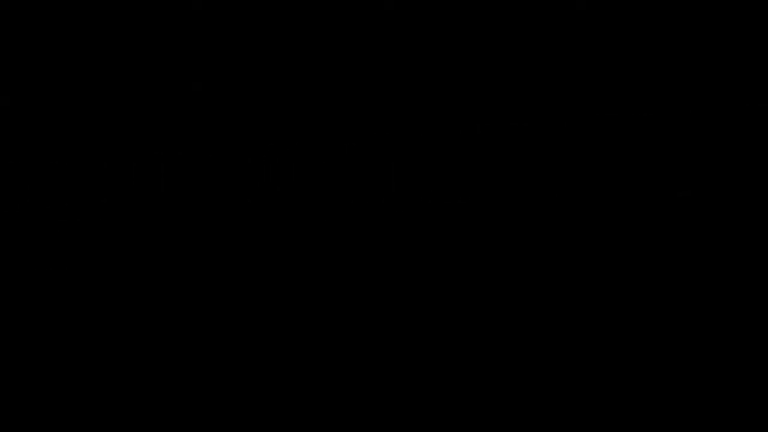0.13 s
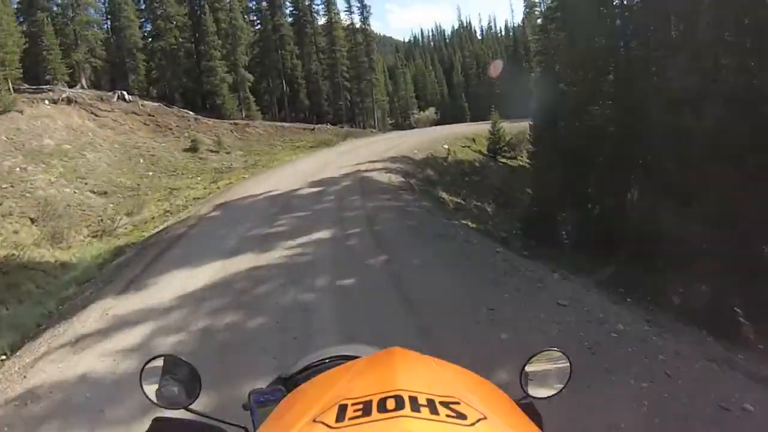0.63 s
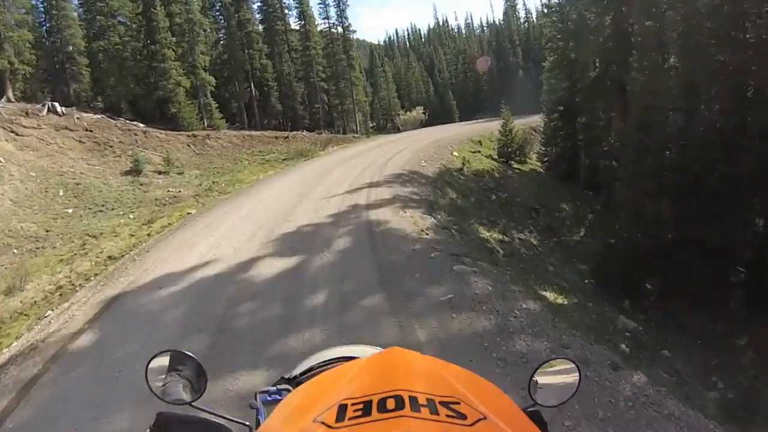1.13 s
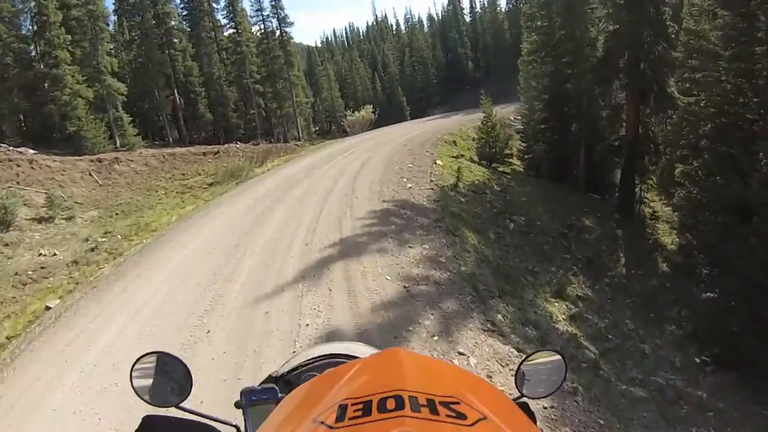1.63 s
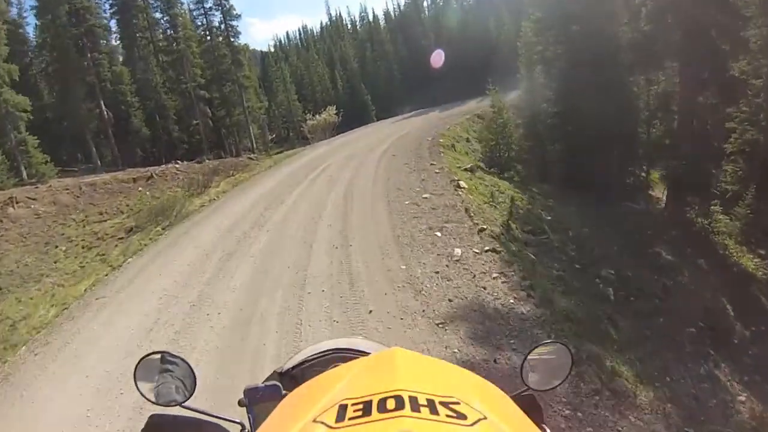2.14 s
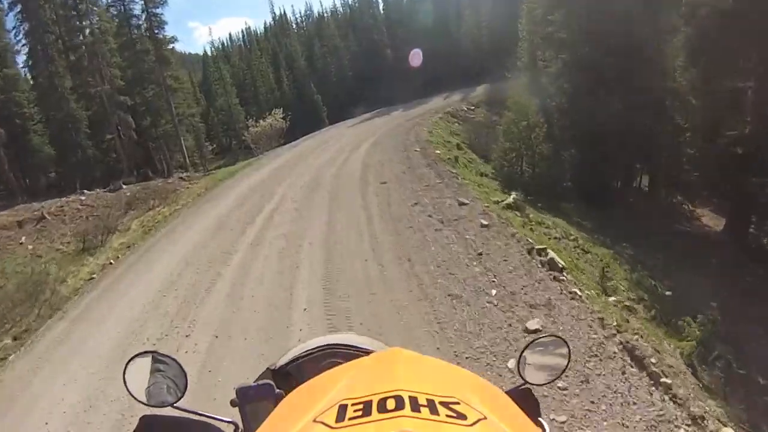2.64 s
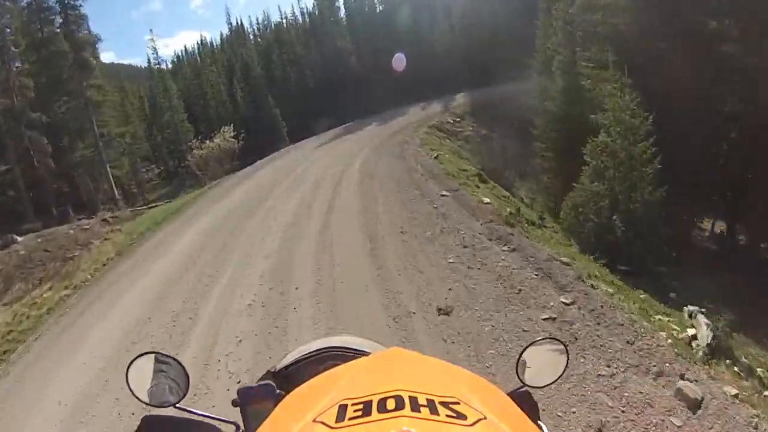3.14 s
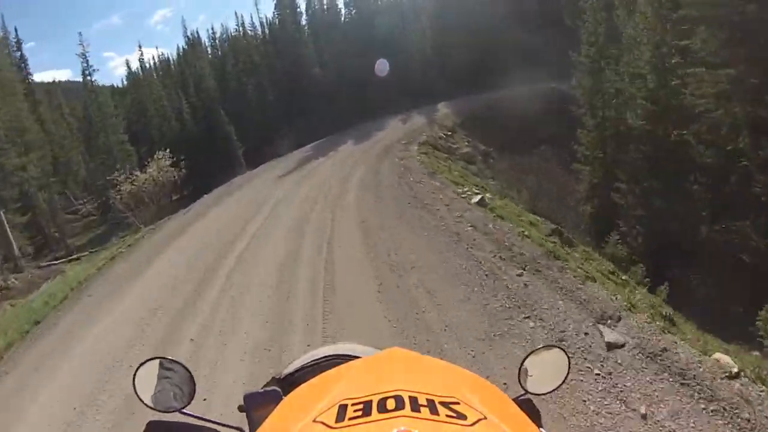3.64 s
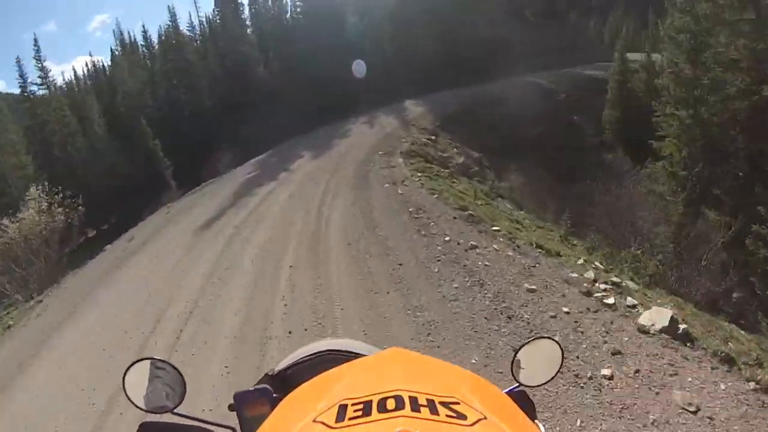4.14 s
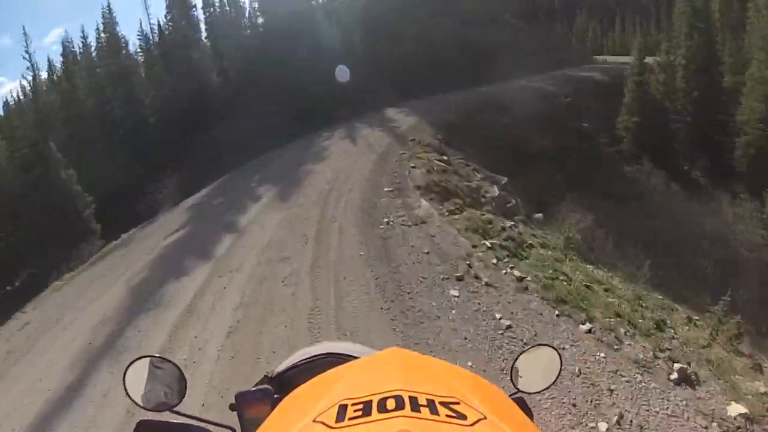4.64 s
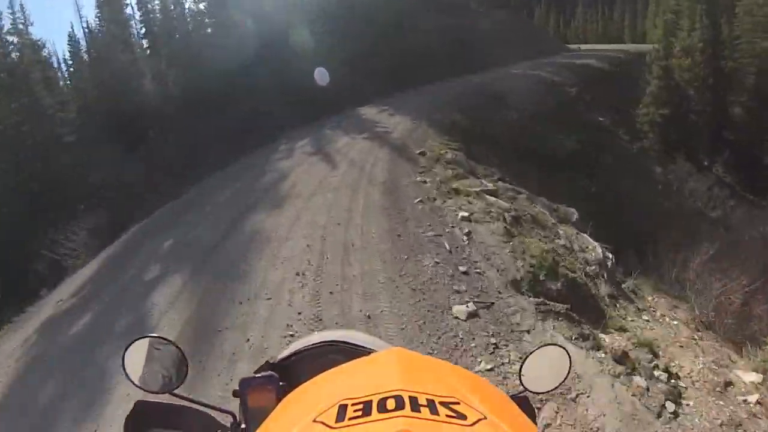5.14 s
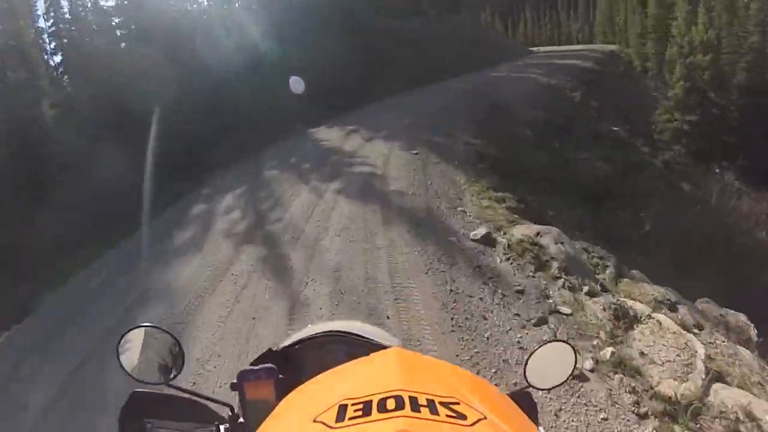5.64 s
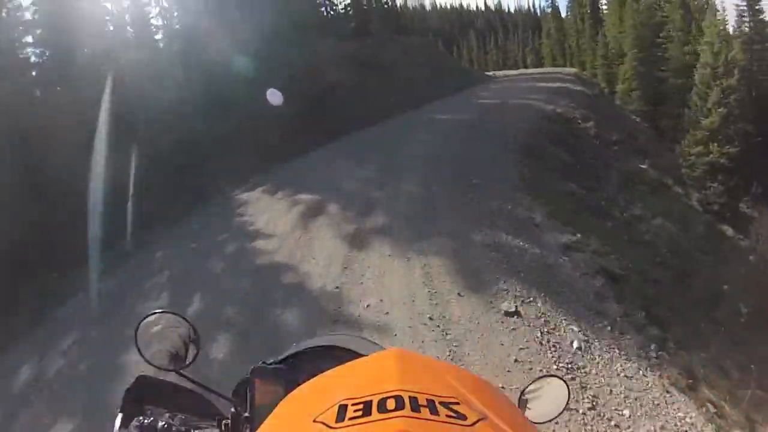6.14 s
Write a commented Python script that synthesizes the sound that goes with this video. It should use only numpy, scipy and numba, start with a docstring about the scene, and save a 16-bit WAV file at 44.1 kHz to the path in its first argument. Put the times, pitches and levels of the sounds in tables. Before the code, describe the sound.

A helmet-mounted, enclosed microphone hears a motorcycle's low, uneven chugging, with faint mechanical ticking and a hollow housing buzz that grows as the throttle opens. Airy wind and road hiss throb along with each firing, while short gusts thud. A barely audible high whistle vanishes early. After five seconds, thrown stones clack and rattle against the bike on the open forest road, and wind rises to an abrupt end.

```python
"""A climbing gravel road, heard at a boxed camera on the helmet of a single-cylinder motorcycle's rider.
Each firing is an impulse that excites decaying exhaust modes, a burst of noise and the camera housing.
Filtered noise gives wind, rustle and hiss, all stirred by the exhaust beat; smooth pulses are hard gusts.
Stones are short noise bursts, and a faint whistle, a narrow resonance driven by noise, dies early.
The sum is dulled, softly limited, ducked in small steps at its peaks and faded in."""
import sys
import numpy as np
from scipy import signal
from scipy.fft import rfft, irfft, next_fast_len
from scipy.io import wavfile
from scipy.ndimage import uniform_filter1d
from numba import njit

SR = 44100
rng = np.random.default_rng(int(sys.argv[2]) if len(sys.argv) > 2 else 0)


def volts_from_db(level):
    """Convert decibel levels to linear amplitude ratios."""
    exponent = np.asarray(level, float) / 20
    return 10 ** exponent


def to_wav(s):
    """Save 16-bit WAV."""
    ch = np.atleast_2d(s).T  # columns
    pcm = np.round(np.clip(ch, -1, 1) * 32767)  # PCM
    wavfile.write(sys.argv[1], SR, pcm.astype(np.int16))


N = 276631
TIME_S = np.arange(N) / SR

# crankshaft speed, one firing every second turn: [t/s, speed/rpm]
CRANK_SPEED = [(0.25, 2307.1), (0.5, 2133.8), (0.85, 2109.5), (1.4, 2071.9), (1.63, 2160.2), (1.86, 2079.5),
               (2.4, 2071.2), (3.1, 2111.5), (4.2, 2237.1), (5.1, 2353.8), (5.76, 2409.1), (6.3, 2347.8)]
# engine load as the throttle opens on the climb: [t/s, load/1]
ENGINE_LOAD = [(0.5, 0.24), (1.5, 0.06), (2.3, 0.49), (3, 0.44), (3.4, 0.5), (3.7, 0.64), (4.3, 0.71),
               (4.8, 0.86), (5.3, 0.89), (5.8, 0.89), (6.3, 0.65)]
# exhaust modes: [f/Hz, signed relative strength/1, swell time/ms, time advance/ms, gain at full load/dB]
EXHAUST_MODES = [(95.8, -0.95, 5.73, 7.3, 3.5), (125.6, -0.074, 8, 5, 11.5), (262.8, 0.41, 8.2, 6.9, 6.5),
                 (39.33, 0.28, 25, 12.0, 4.5)]
# camera housing modes: [f/Hz, relative level/dB, t60/s]
HOUSING_MODES = [(688.6, 8.5, 0.098), (884, -3.5, 0.14)]
# how hard the engine's shake reaches the helmet: [t/s, relative level/dB]
HELMET_SHAKE = [(0.4, -45), (0.6, -41.5), (0.95, -38.5), (1.3, -42.5), (2.0, -41.5), (2.7, -46.5),
                (3.15, -40.5), (3.35, -44), (3.65, -37), (4.1, -38), (4.4, -34), (4.8, -39), (5.0, -35),
                (5.55, -33.5), (5.7, -37), (6.27, -32.5)]
# strength of the air stream past the helmet: [t/s, relative level/dB]
AIR_STREAM = [(0.4, 0), (.6, 2), (.7, 2), (.9, 3.5), (1.3, -2), (1.9, 0), (2.5, 0.5), (2.8, -3), (3.1, 5.5),
              (3.35, -1), (3.7, 1), (4.1, -1.5), (4.4, 2), (4.7, 1.5), (5.1, 5), (5.4, 2), (5.52, 6.5),
              (5.75, 2.5), (5.97, 7.5), (6.04, -2), (6.075, 7), (6.11, 5.5), (6.18, 7.5), (6.21, 8),
              (6.24, 9), (6.27, 9.5)]
# spectral densities of the three noises: [f/Hz, relative level/dB]
RUMBLE_SPECTRUM = [(12, -9.5), (25, -2.5), (50, -2), (75, -5), (100, -6.5), (130, -10.5), (180, -14.5),
                   (300, -22), (420, -31)]
RUSTLE_SPECTRUM = [(150, -15), (260, 5), (340, -2), (430, -2), (540, 0), (690, -6), (800, -6), (950, -7.5),
                   (1250, -18.5), (1700, -22), (2300, -37)]
HISS_SPECTRUM = [(590, -22), (1000, -0.5), (1080, -5), (1490, -13), (2040, -11.5), (2420, -17.5),
                 (3080, -14), (3740, -24), (5160, -21), (5990, -28), (6950, -28), (8850, -34.5),
                 (11400, -35.5), (14200, -45), (15500, -45)]
# hard gusts on the microphone port: [t/s, signed pressure/1, width/ms]
GUSTS = [(0.608, -1.21, 3.9), (1.004, 0.58, 2.3), (1.180, -0.31, 1.8), (1.418, 0.31, 12), (1.689, 0.3, 8.2),
         (1.843, -0.85, 5.2), (1.961, 0.72, 5.1), (2.151, 0.49, 5.8), (2.324, 0.45, 4), (2.611, 0.64, 3.5),
         (2.951, -0.42, 12), (3.02, -0.4, 1.6), (3.313, -0.78, 7.5), (3.799, -0.15, 1.6),
         (3.963, 0.69, 3.8), (4.232, -0.31, 3.9), (4.576, -0.84, 6), (4.658, 0.48, 8.7), (4.81, 0.51, 6.2),
         (5.033, -0.54, 4.6), (5.329, 0.24, 6.8), (5.823, 0.3, 5.8)]
# stones thrown against the frame: [t/s, level before the envelope/dB, centre f/Hz, decay time/ms]
STONE_HITS = [(0.609, -41, 4500, 7), (0.800, -44.5, 7500, 12), (1.336, -41, 950, 6.5),
              (1.851, -34.5, 5000, 17), (1.957, -40, 3800, 6.3), (2.084, -27.5, 950, 16),
              (5.487, -23, 920, 10), (5.507, -21, 950, 6.6), (5.574, -15, 1500, 6.4),
              (5.579, -25.5, 3600, 8.4), (5.618, -33, 2300, 13), (5.686, -29, 3600, 16),
              (5.842, -22, 1090, 11), (5.950, -22, 950, 23), (5.960, -40, 4700, 40), (6.062, -22, 890, 13),
              (6.115, -28, 885, 10), (6.144, -20, 990, 17), (6.174, -22, 990, 3.4), (6.183, -23, 940, 10)]

FIRST_FIRING_S = 0.1746   # at full load
ADVANCE_MS = 1.8          # firings come this much earlier at zero load
THUMP_DB, FIRING_JITTER_MS = -13, 0.1   # gain at no load; spread of the timing
UNEVEN_DB, UNEVEN_LOAD_DB = 1, -0.8     # firings vary most at light load
PIPE_ECHO_MS, ECHO_SHARE, ECHO_RISE = 9.24, 0.27, 0.36   # the share rises with load
# gas bursting past the exhaust valve
RASP_DB, RASP_LOAD_DB, RASP_MS, RASP_LOW_HZ, RASP_HIGH_HZ = -49.5, 4.5, 3, 824, 2980
RING_DB, ROAD_SHAKE = 4, 0.008   # gain on HELMET_SHAKE; road noise against unit shake impulses
# the valve gear is loudest near one speed
KNOCK_DB, KNOCK_RISE_DB, KNOCK_RPM, KNOCK_SPAN_RPM, KNOCK_OFF_DB = -38.5, 1, 2254, 90, -13
TAP_HZ = 790
CLACK_DB, CLACK_HZ, CLACK_T60_S = -42, 474, 0.014   # the t60 is that of each of two resonators
THROB_LOAD_DB = 0.5   # change of the beat's depth at full load
RUMBLE_DB, RUMBLE_FOLLOWS, RUMBLE_LOAD_DB = -15, -0.034, -4   # the rumble eases with load
RUSTLE_DB = -30.5
# further dependence of the rustle on the air level, above and below two pitches
BRIGHT_HZ, BRIGHT_FOLLOWS = 860, 0.62
BOOM_HZ, BOOM_FOLLOWS, BOOM_LOAD_DB = 382, 1.24, -6   # the low rustle thins under load
# shares of the air's and the gusts' dB swing heard in the hiss
HISS_DB, HISS_FOLLOWS, HISS_GUSTS, HISS_LOAD_DB = -41, 0.34, 0.66, 4.5
GUST_BUILD_S, GUST_SURGE_DB, GUST_DUCK_S, GUST_DUCK_DB = 0.022, 5, 0.14, -4.5   # dB for unit pressure
STONE_ATTACK_MS = 1.6
# the t60 is that of each of two resonators
WHISTLE_HZ, WHISTLE_T60_S, WHISTLE_DB, WHISTLE_ENDS_S = 11100, 0.012, -71, 1.44
TOP_HZ, OVERLOAD = 12600, 2.1   # low-pass corner; soft limit of the amplitude
CEILING, DUCK_DB, RECOVER_DB_PER_S = 0.51, 0.33, 27.5   # the ceiling precedes fade and output gain
FADE_START_S, FADE_LENGTH_S, FADE_POWER, OUTPUT_DB = 0.27, 0.32, 0.72, -1.5


def exhaust():
    """Modal superposition: each firing swells in the pipe modes and returns once from the pipe's end."""
    load = in_time(ENGINE_LOAD)
    clicks = firings(uneven_db=UNEVEN_DB + UNEVEN_LOAD_DB * load, jitter_ms=FIRING_JITTER_MS)
    t = np.arange(SR // 8) / SR
    thump = np.zeros(N)
    for hz, strength, swell_ms, advance_ms, load_db in EXHAUST_MODES:
        u = t * 1000 / swell_ms
        swell = u * np.exp(1 - u)   # the pipe fills, then empties
        wave = signal.fftconvolve(clicks, strength * swell * np.sin(2 * np.pi * hz * t))
        advanced = wave[int(advance_ms * SR / 1000):][:N]
        thump += volts_from_db(load_db * load) * advanced
    echo = (ECHO_SHARE + ECHO_RISE * load) * pipe_delay(thump)
    return volts_from_db(THUMP_DB) * (thump + echo)


def rasp():
    """Jet noise: each firing spits a soft-edged burst past the exhaust valve; the pipe echo repeats it weaker."""
    fade = np.exp(-1000 / (RASP_MS * SR))
    clicks = firings(uneven_db=3.5, jitter_ms=1.24, turn=-0.077)
    burst = signal.lfilter([1], [1, -2 * fade, fade ** 2], clicks)
    burst = burst + 0.69 * pipe_delay(burst)
    hiss = coloured(HISS_SPECTRUM, lumpy_db=1.7, rate=37)
    noise = filtered(hiss, 2, [RASP_LOW_HZ, RASP_HIGH_HZ], "band")
    return volts_from_db(RASP_DB + RASP_LOAD_DB * in_time(ENGINE_LOAD)) * rms_one(burst * noise)


def engine():
    """Forced resonance: the crank's mechanical excitation reaches the helmet as ring, knock and clack."""
    return housing_ring() + valve_knock() + valve_clack()


def housing_ring():
    """Alternating forcing: two opposed shakes a cycle favour the odd orders in the camera housing's modes."""
    load = in_time(ENGINE_LOAD)
    to = firings(uneven_db=0.5, jitter_ms=0.02, turn=-0.1)
    fro = firings(uneven_db=0.5, jitter_ms=0.02, turn=0.4)
    shake = to - (0.5 + 0.5 * load) * fro
    shake = shake + ROAD_SHAKE * rng.standard_normal(N)
    housing = sum(volts_from_db(db) * ring(shake, hz, t60) for hz, db, t60 in HOUSING_MODES)
    housing = filtered(housing, 2, [600, 960], "band")
    running_power = uniform_filter1d(housing ** 2, size=SR // 3)
    evened = housing / np.sqrt(running_power + 1e-12)
    return volts_from_db(RING_DB + in_time(HELMET_SHAKE)) * evened


def valve_knock():
    """Impact excitation: two taps a cycle ring two resonators in series, loudest near one speed."""
    offset = (in_time(CRANK_SPEED) - KNOCK_RPM) / KNOCK_SPAN_RPM
    level_db = KNOCK_DB + KNOCK_RISE_DB * in_time(ENGINE_LOAD) + KNOCK_OFF_DB * np.tanh(offset ** 2)
    taps = firings(uneven_db=6.0, jitter_ms=0.53, turn=-0.0802)
    taps = taps + 0.48 * firings(uneven_db=5.5, jitter_ms=0.6, turn=0.17)
    knock = ring(ring(taps, hz=TAP_HZ, t60=0.014), hz=955, t60=0.014)
    return volts_from_db(level_db) * rms_one(knock)


def valve_clack():
    """Impact excitation: the valve seats a fifth of a cycle after firing and rings a doubled resonator."""
    seats = firings(uneven_db=5.0, jitter_ms=0.75, turn=0.207)
    clack = ring(ring(seats, CLACK_HZ, CLACK_T60_S), CLACK_HZ, CLACK_T60_S)
    return volts_from_db(CLACK_DB) * rms_one(clack)


def buffets():
    """Pressure pulse: a gust is one smooth push with a weak swing back on each side."""
    out = np.zeros(N)
    t = np.arange(-SR // 40, SR // 40)
    for s, pressure, width_ms in GUSTS:
        u = t / SR * 2000 / width_ms
        out[int(s * SR) + t] += pressure * (1 - 0.18 * u ** 2) * np.exp(-u ** 2 / 2)
    return out


def wind_and_road(thump):
    """Turbulence noise at the port, and broad tyre hiss; the exhaust beat modulates all of it."""
    air_db, gust_db, load = in_time(AIR_STREAM), gusting(), in_time(ENGINE_LOAD)

    rumble_db = RUMBLE_DB + RUMBLE_FOLLOWS * air_db + RUMBLE_LOAD_DB * load
    rumble = volts_from_db(rumble_db) * coloured(RUMBLE_SPECTRUM, lumpy_db=0.25, rate=11)
    rumble = rumble * throb(thump, depth_db=0.7, jet=0)

    rustle = volts_from_db(RUSTLE_DB + air_db + gust_db) * coloured(RUSTLE_SPECTRUM, lumpy_db=1.5, rate=27)
    rustle = rustle * throb(thump, depth_db=1.35, jet=0.13)
    top = filtered(rustle, 2, BRIGHT_HZ, "high")
    low = filtered(rustle, 2, BOOM_HZ, "low")
    top_gain = volts_from_db(BRIGHT_FOLLOWS * air_db) * throb(thump, depth_db=-0.5, jet=1.1)
    low_gain = volts_from_db(BOOM_FOLLOWS * air_db + BOOM_LOAD_DB * load)
    rustle = rustle + (top_gain - 1) * top + (low_gain - 1) * low

    hiss_db = HISS_DB + HISS_FOLLOWS * air_db + HISS_GUSTS * gust_db + HISS_LOAD_DB * load
    hiss = volts_from_db(hiss_db) * coloured(HISS_SPECTRUM, lumpy_db=0.5, rate=15.0)
    hiss = hiss * throb(thump, depth_db=1.5, jet=0.56)
    return rumble + rustle + hiss


def throb(thump, depth_db, jet):
    """Amplitude modulation: a gain varying once per engine cycle, raised by each positive exhaust swing."""
    turn = np.cos(np.pi * (cycles() - 0.04)) ** 2
    beat = volts_from_db((depth_db + THROB_LOAD_DB * in_time(ENGINE_LOAD)) * turn)
    return rms_one(beat * (1 + jet * np.maximum(thump, 0)))


def gusting():
    """Exponential gain in dB: rustle and hiss rise to each gust, then are ducked by the recorder and recover."""
    level_db = np.zeros(N)
    for s, pressure, _ in GUSTS:
        late = TIME_S - s - 0.004
        surge = GUST_SURGE_DB * np.exp(-abs(late) / GUST_BUILD_S)
        duck = GUST_DUCK_DB * np.exp(-abs(late) / GUST_DUCK_S)
        level_db += abs(pressure) * np.where(late < 0, surge, duck)
    return level_db


def stones():
    """Impact noise: each stone is a short spray of grit, band-limited around its own pitch."""
    out = np.zeros(N)
    t_ms = np.arange(SR // 14) / SR * 1000
    grit = coloured(HISS_SPECTRUM, lumpy_db=1.5, rate=270)
    for s, level_db, hz, decay_ms in STONE_HITS:
        span = slice(int(s * SR), int(s * SR) + len(t_ms))
        spray = filtered(grit[span], 3, [hz / 1.53, hz * 1.73], "band")
        swell = (1 - np.exp(-t_ms / STONE_ATTACK_MS)) * np.exp(-t_ms / decay_ms)
        out[span] += volts_from_db(level_db) * rms_one(spray) * swell
    return out


def whistle():
    """Narrow-band resonance: noise through two equal resonators, a faint high whistle that dies early."""
    tone = ring(ring(rng.standard_normal(N), WHISTLE_HZ, WHISTLE_T60_S), WHISTLE_HZ, WHISTLE_T60_S)
    fade_out = np.clip((WHISTLE_ENDS_S - TIME_S) / 0.3, 0, 1)
    return volts_from_db(WHISTLE_DB) * rms_one(tone) * fade_out


def cycles():
    """Phase integration: firings so far, from the crank speed and the load's effect on timing."""
    rpm = in_time(CRANK_SPEED)
    turns = np.cumsum(rpm) / (120 * SR)
    early = ADVANCE_MS * (1 - in_time(ENGINE_LOAD)) * rpm / 120000   # ms to engine cycles
    return turns + 1 - turns[int(FIRST_FIRING_S * SR)] + early


def firings(uneven_db, jitter_ms, turn=0):
    """Impulse train: one click per engine cycle, offset by turn cycles, with random timing and strength."""
    count = cycles()
    chance = rng.standard_normal((int(count[-1]) - 1, 2))
    at = np.interp(np.arange(1, len(chance) + 1) + turn, count, np.arange(N))
    at = at + jitter_ms * chance[:, 0] * SR / 1000
    at = np.minimum(at.astype(int), N - 1)
    clicks = np.zeros(N)
    spread_db = abs(uneven_db + np.zeros(N))[at]
    clicks[at] = volts_from_db(spread_db * chance[:, 1])
    return clicks


def pipe_delay(x):
    """Reflection: the wave delayed by its return from the pipe's end."""
    return np.roll(x, int(PIPE_ECHO_MS * SR / 1000))


def ring(x, hz, t60):
    """Damped oscillator: one mode set ringing by x."""
    r, w = volts_from_db(-60 / (t60 * SR)), 2 * np.pi * hz / SR
    return signal.lfilter([0, np.sin(w)], [1, -2 * r * np.cos(w), r * r], x + 1e-18)


def coloured(spectrum, lumpy_db, rate):
    """Spectral shaping: noise of the given spectrum whose level flickers; rms 1."""
    size = next_fast_len(N)
    hz, db = np.transpose(spectrum)
    log_f = np.log(np.fft.rfftfreq(size, 1 / SR) + 1)
    shape = np.interp(log_f, np.log(hz), db, left=-80, right=-120)
    noise = irfft(rfft(rng.standard_normal(size)) * volts_from_db(shape), size)[:N]
    return rms_one(noise * volts_from_db(lumpy_db * drift(rate)))


def drift(rate):
    """Low-pass random process: slow chance at about rate per second; rms 1."""
    r = np.exp(-80 * np.pi * rate / SR)   # one step every 40 samples
    slow = signal.lfilter([1], [1, -2 * r, r * r], rng.standard_normal(N // 40 + 2002))[2000:]
    return np.interp(np.arange(N) / 40, np.arange(len(slow)), rms_one(slow))


def filtered(x, order, hz, kind):
    """Maximally flat (Butterworth) filtering."""
    return signal.sosfilt(signal.butter(order, hz, kind, fs=SR, output="sos"), x)


def rms_one(x):
    """Normalisation to unit mean power."""
    return x / np.sqrt(np.mean(x ** 2) + 1e-20)


def in_time(rows):
    """Linear interpolation of a [t/s, value] table at every sample."""
    s, value = np.transpose(rows)
    return np.interp(TIME_S, s, value)


def scene():
    """Linear superposition of all sources, as one channel."""
    thump = exhaust()
    mix = thump + rasp() + engine() + buffets() + wind_and_road(thump) + stones() + whistle()
    return mix[None]


@njit
def gain_control(x, ceiling, duck, recover, hold):
    """Feedback gain: a notch down when output passes the ceiling, at uneven least spacings, then a slow climb."""
    out, gain, wait = np.empty_like(x), 1.0, 0
    for i in range(len(x)):
        out[i] = gain * x[i]
        wait -= 1
        if wait <= 0 and abs(out[i]) > ceiling:
            gain, wait = gain * duck, hold[i]
        gain = min(gain * recover, 1.0)
    return out


def top_cut(x):
    """Nothing passes above the cut-off."""
    return signal.sosfilt(signal.butter(12, 15680, fs=SR, output="sos"), x)


def record(dry):
    """Low-pass filtering, saturation of peaks, stepped gain control and a fade-in."""
    dull = filtered(dry[0], 3, TOP_HZ, "low")
    rounded = OVERLOAD * np.tanh(dull / OVERLOAD)
    hold = rng.integers(SR // 9000, SR // 2200, size=N)   # samples between notches
    held = gain_control(rounded, CEILING, volts_from_db(-DUCK_DB), volts_from_db(RECOVER_DB_PER_S / SR), hold)
    fade = np.clip((TIME_S - FADE_START_S) / FADE_LENGTH_S, 0, 1) ** FADE_POWER
    mix = held[None] * fade * volts_from_db(OUTPUT_DB)
    return top_cut(mix)


dry = scene()
out = record(dry)
to_wav(out)
```